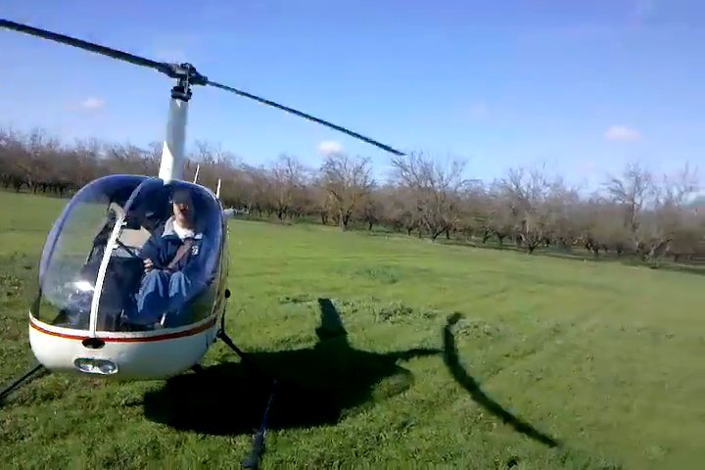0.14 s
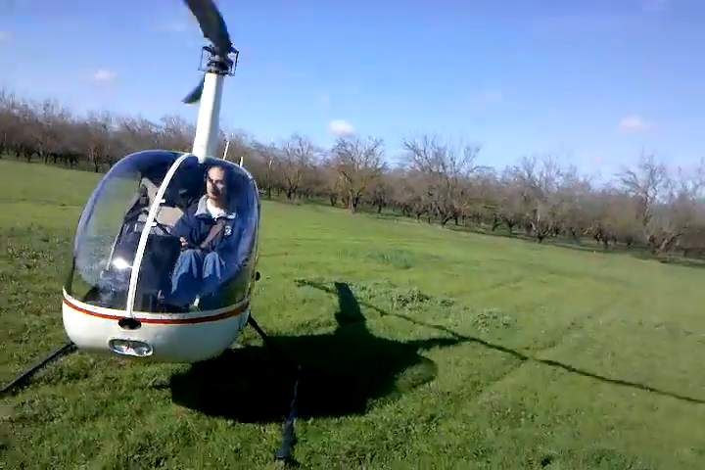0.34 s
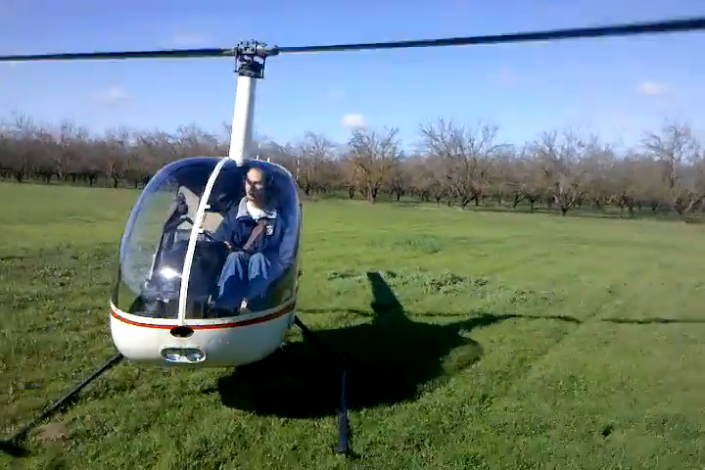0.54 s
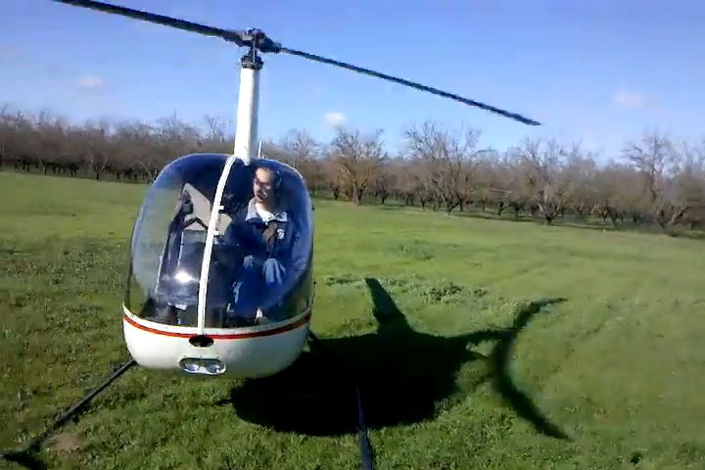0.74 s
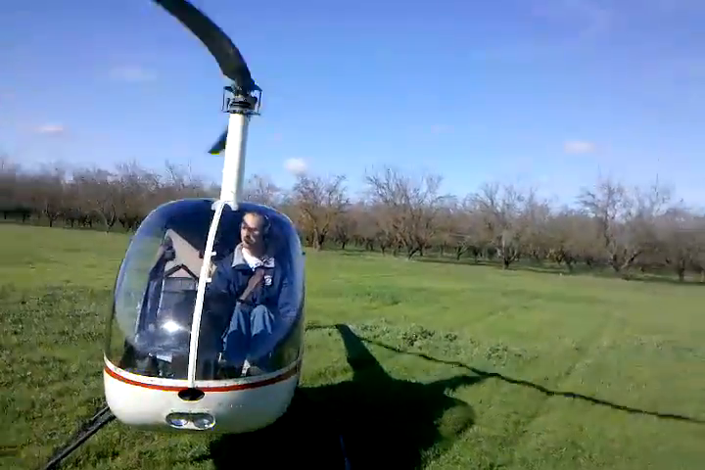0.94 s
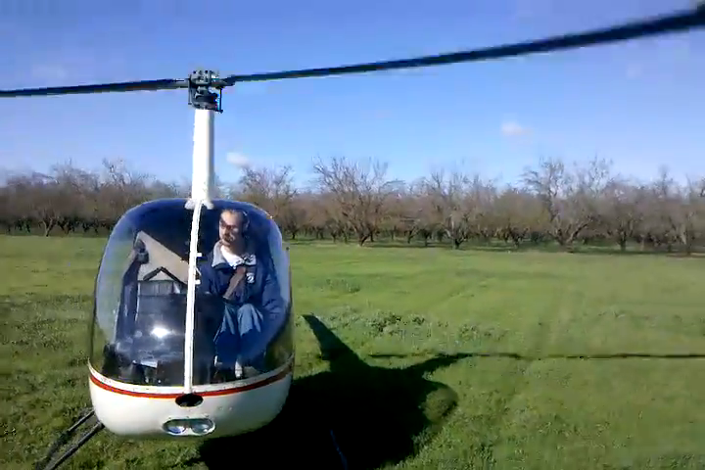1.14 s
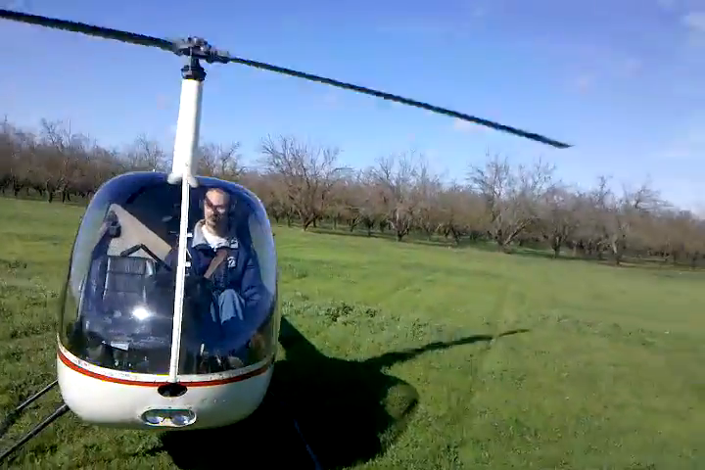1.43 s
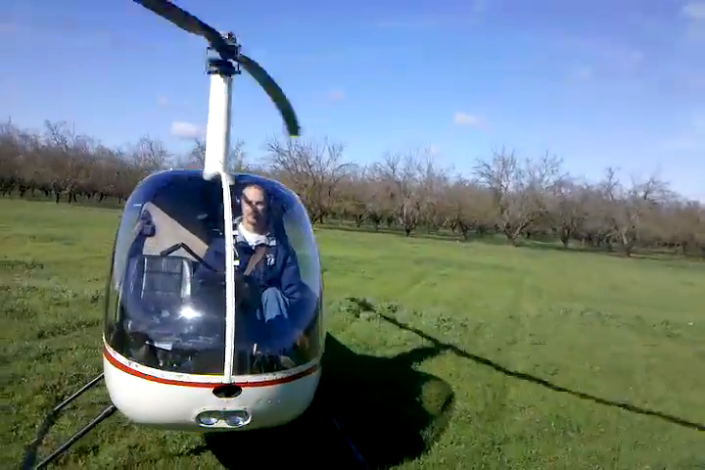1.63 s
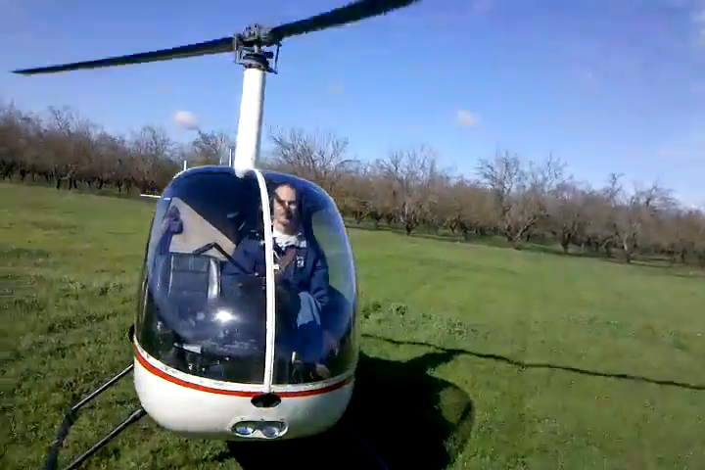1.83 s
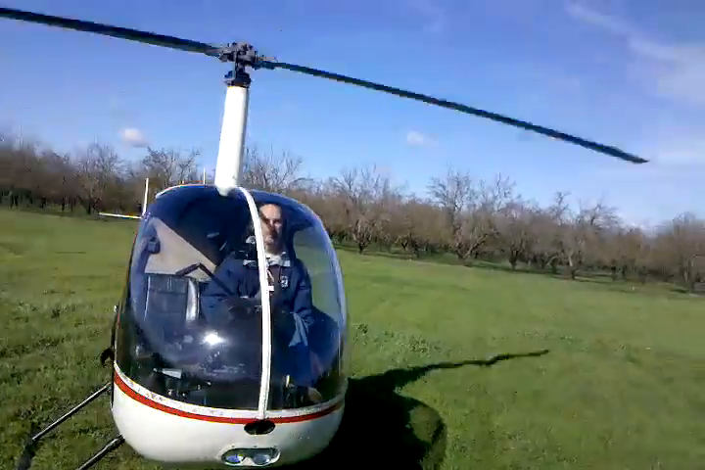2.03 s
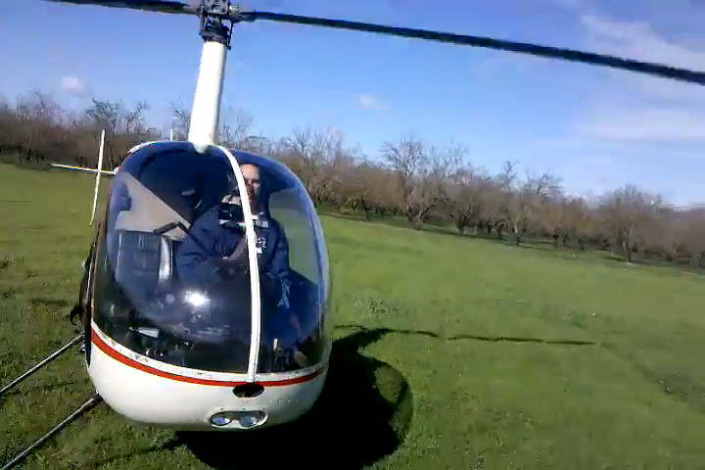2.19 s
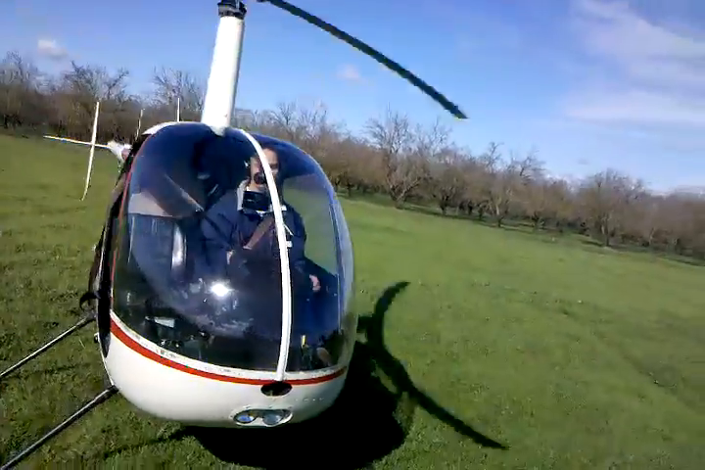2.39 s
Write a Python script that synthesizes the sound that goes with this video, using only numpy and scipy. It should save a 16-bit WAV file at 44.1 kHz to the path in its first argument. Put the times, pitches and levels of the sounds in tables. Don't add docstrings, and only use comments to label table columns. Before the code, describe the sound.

Rapid airy rotor chops beat over the rough, low buzz of a small helicopter engine and its exhaust and fan rush, in an open field; the level rises gently as the microphone nears, interrupted once by a split-second silence.

```python
import sys
import numpy as np
from scipy import signal
from scipy.fft import rfft, irfft, next_fast_len
from scipy.io import wavfile
from scipy.ndimage import uniform_filter1d, map_coordinates

SR = 44100
rng = np.random.default_rng(int(sys.argv[2]) if len(sys.argv) > 2 else 0)


def generate_wav(sig):
    pcm = np.round(np.clip(np.atleast_2d(sig).T, -1, 1) * 32767).astype(np.int16)
    wavfile.write(sys.argv[1], SR, pcm)


def magnitude_from_level(level_db):
    exponent = np.asarray(level_db, float) / 20
    return 10 ** exponent


N = 112455

# time_s, level_db
APPROACH = [
    (0, -0.5),
    (.5, 0),
    (1, 1),
    (1.5, 1),
    (2, 1.5),
    (2.55, 2.5),
]
# time_s, level_db
BLADE_LOADING = [
    (0, -1),
    (.5, -0.5),
    (1, -1.5),
    (1.5, 0.5),
    (2, 0.5),
    (2.55, 1.5),
]
# time_s, level_db
LOW_BEAT = [
    (0, -1.5),
    (.7, -4.5),
    (1.1, 1.5),
    (1.5, 0.5),
    (2, 0.5),
    (2.55, 5.5),
]
# time_s, firings_per_s
FIRING_RATE = [(0, 58.1), (.9, 58.1), (1.3, 58.2), (2.55, 58.2)]
# frequency_hz, level_db
PIPE_TONE = [(40, -66), (58, -11.5), (116, -0.5), (174, 3), (232, 0), (290, -7.5), (460, -20),
             (2500, -84.5)]
# frequency_hz, level_db
BARK_TONE = [(70, -70), (135, -8), (185, -14), (215, -5), (255, -12), (290, 0), (380, -1), (900, -45)]
CYLINDER_BARK = [-2.1, -0.94, 1.4, -.3]
# frequency_hz, level_db
CRACKLE_TONE = [(150, -63.5), (400, -5), (800, -6.5), (1500, -5), (4000, -44), (9000, -91)]
# frequency_hz, level_db
ROAR_TONE = [(28, -69), (70, -18.5), (190, -1), (330, -0.5), (700, -8), (1500, -14), (2300, -23.5),
             (7000, -24.5)]
# frequency_hz, level_db
SWISH_TONE = [(50, -70), (250, -1.5), (450, 2), (900, -0.5), (1600, -8.5), (2200, -12), (4000, -15.5),
              (7000, -15.5)]
# frequency_hz, level_db
RECORDER_BAND = [(6800, 0.5), (7200, -9.5), (7600, -23.5), (8000, -31.5), (8700, -36), (9100, -45),
                 (9300, -90)]

DROP_FROM_S, DROP_TO_S = 1.5884, 1.7159
PASS_HZ, FIRST_PASS_S = 11.6, 0.032


def unit(x):
    return x / np.sqrt(np.mean(x ** 2) + 1e-20)


def curve(rows):
    return np.interp(np.arange(N) / SR, *np.transpose(rows))


def wobble(rate_hz):
    knots = rng.standard_normal(400)
    return map_coordinates(knots, [np.arange(N) * rate_hz / SR])


def coloured(x, points):
    size = next_fast_len(N + 8192)
    hz, db = np.transpose(points)
    log_hz = np.log(np.fft.rfftfreq(size, 1 / SR) + 1)
    gain = magnitude_from_level(np.interp(log_hz, np.log(hz + 1), db))
    return irfft(rfft(x, size) * gain, size)[:N]


def rush(points, patchy_db):
    grains = signal.stft(rng.standard_normal(N), nperseg=512)[2]
    patches = uniform_filter1d(rng.standard_normal(grains.shape), size=5, axis=0)
    patches = unit(uniform_filter1d(patches, size=5, axis=1))
    air = signal.istft(grains * magnitude_from_level(patchy_db * patches), nperseg=512)[1][:N]
    return unit(coloured(air, points))


def clock():
    t = np.arange(N) / SR
    slip_s = 0.0644
    return t - slip_s * (t > DROP_TO_S - 0.05)


def firings():
    first_firing_s = 0.0119
    rate = curve(FIRING_RATE)
    return np.cumsum(rate * np.gradient(clock())) - first_firing_s * rate[0]


def passes(lead_s):
    edge, width, skew, wander_rad = 2, 0.18, -0.1, 0.12
    turn = PASS_HZ * (clock() - FIRST_PASS_S + lead_s)
    angle = 2 * np.pi * turn + wander_rad * wobble(15)
    facing = np.cos(angle + skew * np.cos(angle))
    return (1 + np.tanh(edge * (facing - width))) / 2, turn


def roar():
    fan_hz, fan_width_hz = 6163, 200
    puff = 1 + 0.072 * np.cos(2 * np.pi * firings())
    fan_tone = [
        (20, -120),
        (fan_hz - 2 * fan_width_hz, -60),
        (fan_hz, 0),
        (fan_hz + 2 * fan_width_hz, -60),
        (20000, -120),
    ]
    whine = magnitude_from_level(-57) * rush(fan_tone, patchy_db=1.5)
    level = magnitude_from_level(-24.5 + 0.29 * wobble(6.95))
    return level * puff * rush(ROAR_TONE, patchy_db=0.7) + whine


def crackle():
    scatter_db, narrowness, lag = 3, 2.5, 0.06
    turn = firings()
    size = magnitude_from_level(scatter_db * rng.standard_normal(200))[np.round(turn).astype(int)]
    burst = np.exp(narrowness * np.cos(2 * np.pi * (turn - lag)))
    return magnitude_from_level(-36.5) * unit(size * burst * rush(CRACKLE_TONE, patchy_db=0.7))


def engine():
    scatter_db, jitter_s, blade_shade = 1.06, 0.00019, 0.092
    count = np.floor(firings()).astype(int)
    at = np.flatnonzero(np.diff(count) == 1) + 1
    luck = rng.standard_normal((len(at), 3))

    thud_size = magnitude_from_level(scatter_db * luck[:, 1] + 0.4 * wobble(9)[at])
    thud = np.bincount(at, thud_size, N)

    late = np.clip(at + np.round(jitter_s * SR * luck[:, 0]).astype(int), 0, N - 1)
    bark_size = np.take(CYLINDER_BARK, count[at] % 4) * magnitude_from_level(2 * scatter_db * luck[:, 2])
    bark = np.bincount(late, bark_size, N)

    shade = 1 + blade_shade * np.cos(2 * np.pi * passes(0)[1])
    thud = magnitude_from_level(-28.5) * unit(coloured(thud, PIPE_TONE))
    bark = magnitude_from_level(-33) * unit(coloured(bark, BARK_TONE))
    return shade * (thud + bark)


def rotor():
    scatter_db, low_lead_s = 0.5, 0.006
    air = rush(SWISH_TONE, patchy_db=2.5)
    low = coloured(air, [(1200, -10.5), (2200, -37)])
    swell, turn = passes(0)
    early_swell = passes(low_lead_s)[0]

    size = magnitude_from_level(scatter_db * rng.standard_normal(60))[np.round(turn).astype(int)]
    size = uniform_filter1d(size, size=400)
    size = size * magnitude_from_level(curve(BLADE_LOADING) + 0.4 * wobble(40))

    low_beat = low * magnitude_from_level(curve(LOW_BEAT)) * early_swell
    swish = (air - low) * swell
    return magnitude_from_level(-26) * size * (low_beat + swish) / np.sqrt(np.mean(swell ** 2))


def scene():
    helicopter = roar() + crackle() + engine() + rotor()
    return (magnitude_from_level(curve(APPROACH)) * helicopter)[None]


def top_cut(x):
    return signal.sosfilt(signal.butter(12, 9250, fs=SR, output="sos"), x)


def record(dry):
    ceiling, fade_s = 0.55, 0.0003
    t = np.arange(N) / SR
    held = dry[0] / (1 + np.abs(dry[0] / ceiling) ** 4) ** (1 / 4)
    on = np.clip(np.maximum(DROP_FROM_S - t, t - DROP_TO_S) / fade_s, 0, 1)
    open_gate = (t < DROP_FROM_S + 0.001) | (t > DROP_TO_S - 0.001)
    mix = coloured(held * on, RECORDER_BAND) * open_gate
    return top_cut(mix[None])


dry = scene()
out = record(dry)
generate_wav(out)
```